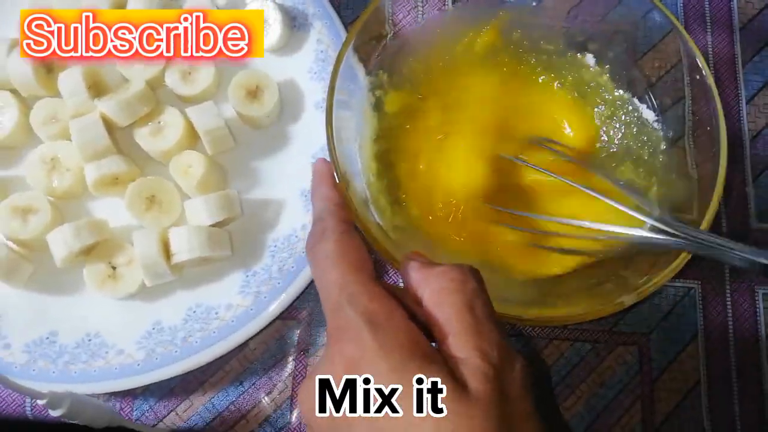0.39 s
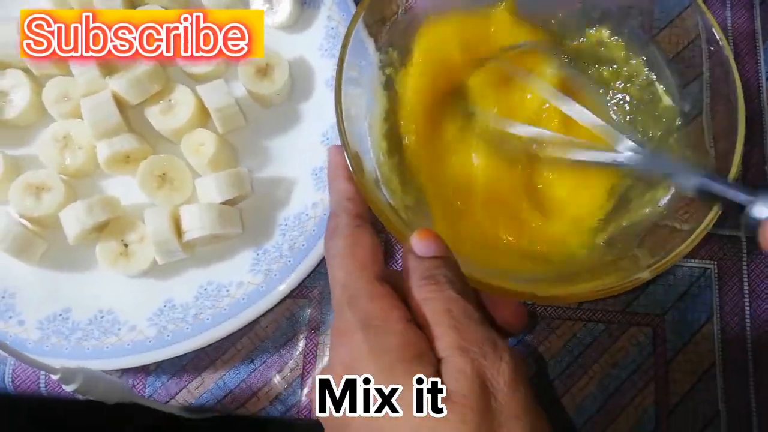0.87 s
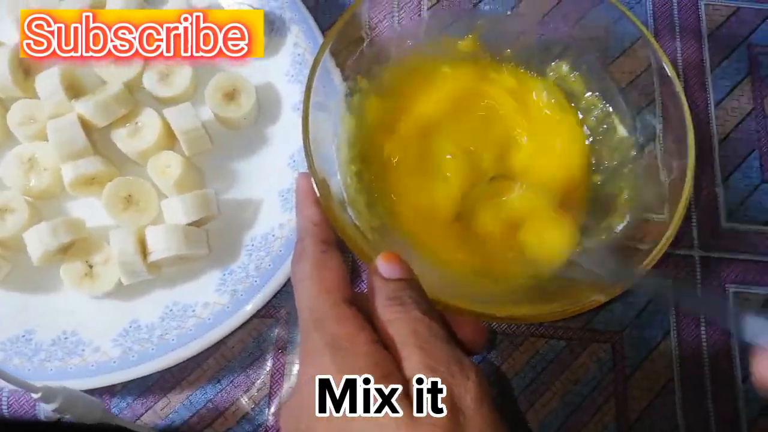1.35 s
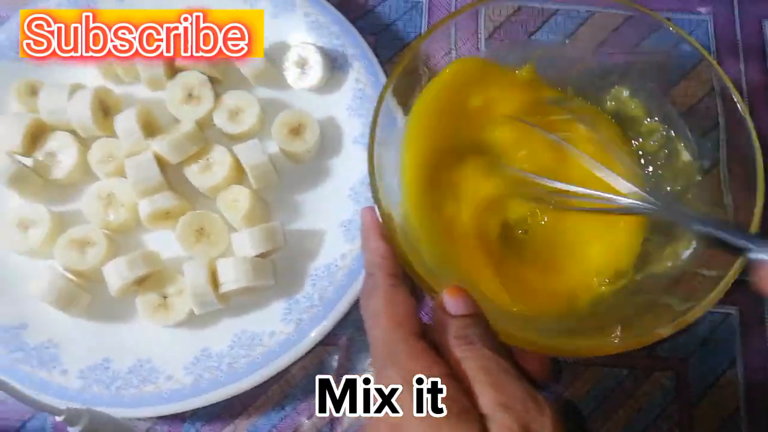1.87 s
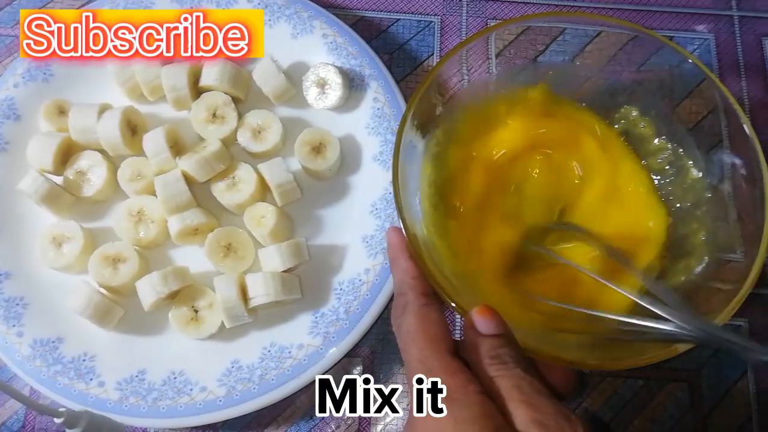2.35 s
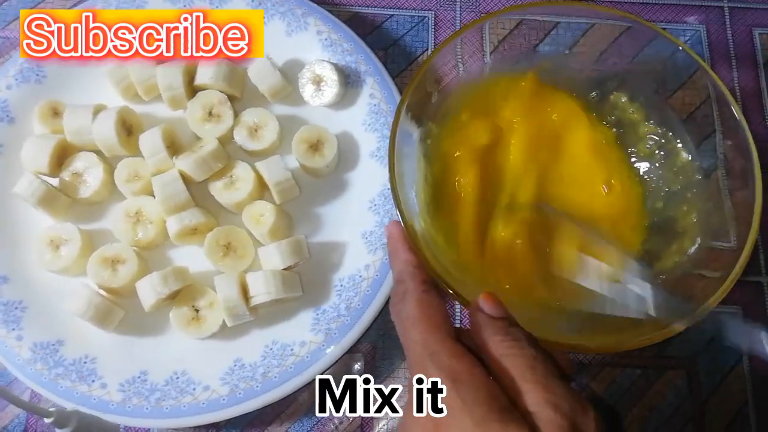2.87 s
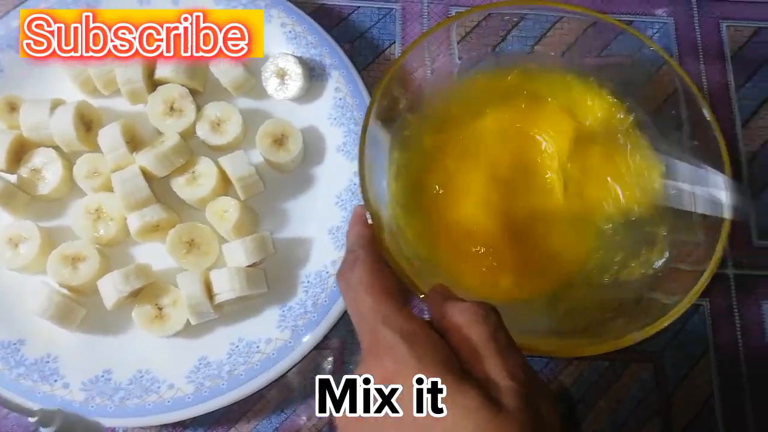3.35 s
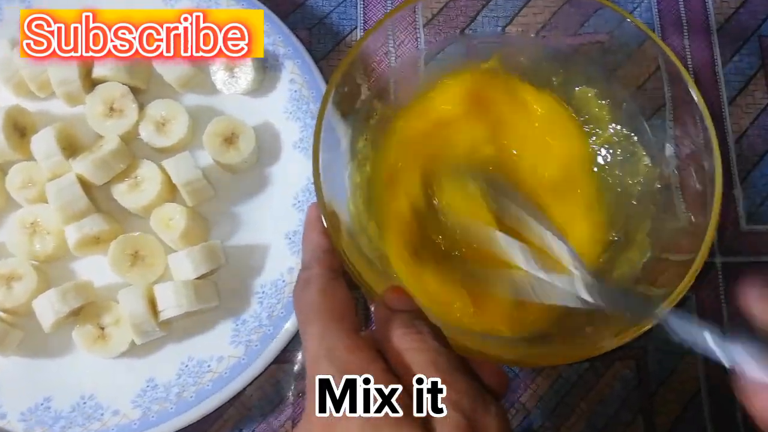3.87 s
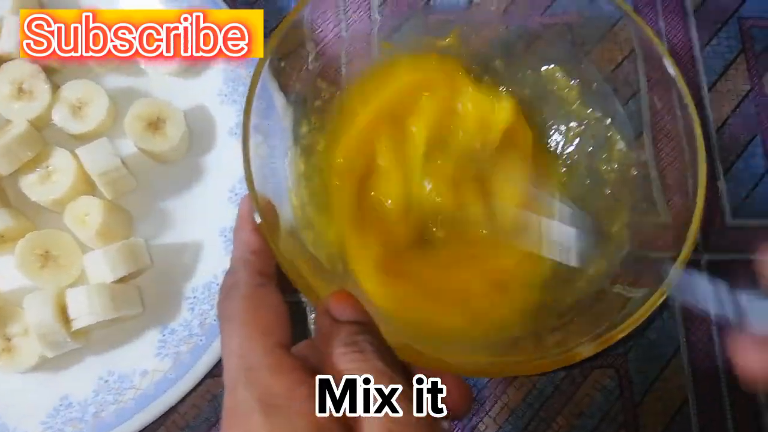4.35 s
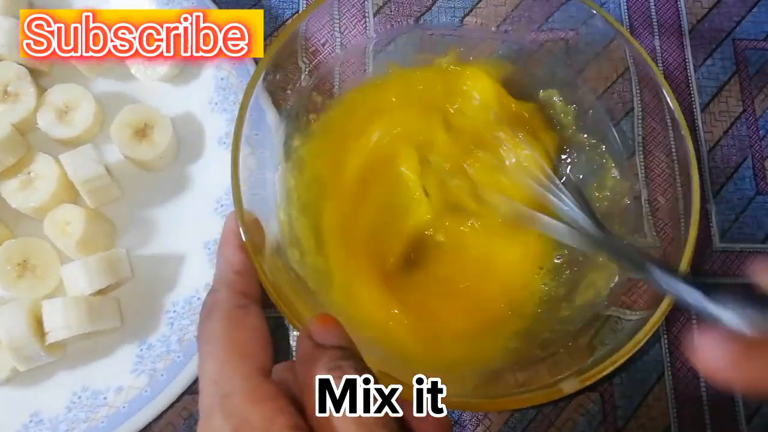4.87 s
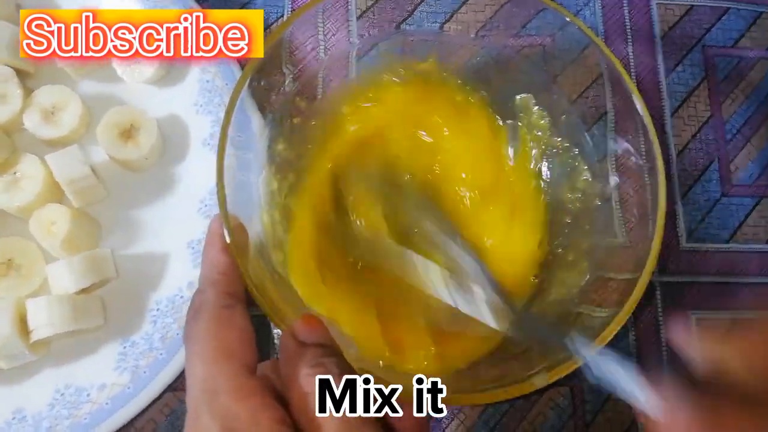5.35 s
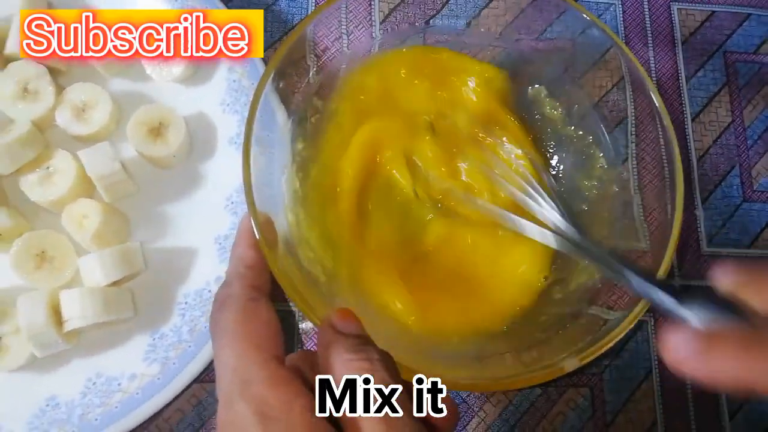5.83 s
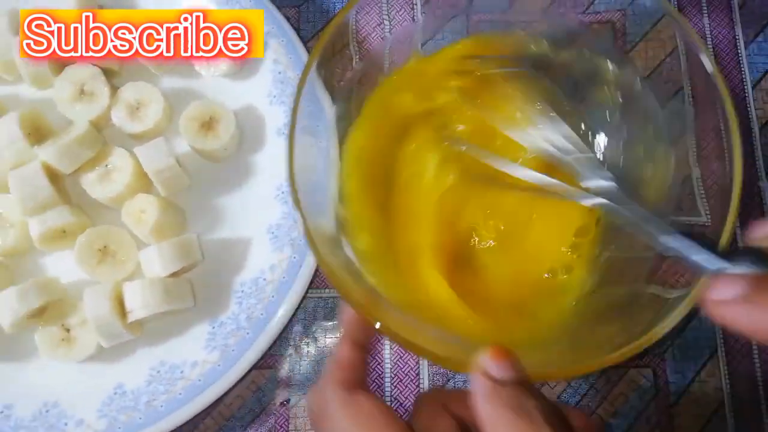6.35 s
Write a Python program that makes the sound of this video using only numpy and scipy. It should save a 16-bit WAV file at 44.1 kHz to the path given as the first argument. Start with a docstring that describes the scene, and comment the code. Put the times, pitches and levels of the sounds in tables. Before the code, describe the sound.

A metal whisk beats thick egg in a glass bowl at about five strokes a second. It starts softly, becomes vigorous within a second, eases briefly near three seconds, then goes on hard to the end. Bright wire clatter, scrapes, dull taps and wet slops, close to the microphone in a small hard kitchen.

```python
"""A wire whisk beats thick egg in a glass bowl on a kitchen table, about five strokes a second, heard close by.
It begins softly, is in full swing from 0.8 s, slows and slops less around 3 s, then beats on hard to the end.
In each stroke the wires brush the glass, clash on it in a bunch of noise pulses and drag along it as ticking
noise; the egg slops as a wet rush with bubbles, a low swing jolts the table, and the wires lift off.
Single taps, catches and gulps fall between; a small hard room answers; one microphone feeds both channels."""
import sys
import numpy as np
from scipy import signal
from scipy.fft import rfft, irfft, next_fast_len
from scipy.io import wavfile
from scipy.ndimage import uniform_filter1d, map_coordinates

SR = 44100
rng = np.random.default_rng(int(sys.argv[2]) if len(sys.argv) > 2 else 0)


def convert_level_to_amplitude(level_db):
    """Map a level in decibels to its linear amplitude factor."""
    exponent = np.asarray(level_db, float) / 20
    return 10 ** exponent


def master(y):
    """Save y as 16-bit WAV."""
    cut = np.clip(np.atleast_2d(y).T, -1, 1)
    pcm = np.round(cut * 32767)  # scale
    wavfile.write(sys.argv[1], SR, pcm.astype(np.int16))


N = 296198

# bunch of wires landing on the glass, one per stroke: t/s, peak level/dB, ring centre f/Hz
STROKES = [(0.231, -20.5, 4000), (0.41, -37.5, 3200), (0.614, -42, 2030), (0.8082, -12.5, 4050),
           (0.9931, -28, 4850), (1.2007, -25.5, 4550), (1.4075, -22, 4630), (1.5867, -19, 4170),
           (1.778, -17, 4700), (1.9829, -19.5, 4120), (2.166, -20, 3680), (2.3625, -16, 4400),
           (2.5392, -16, 4150), (2.7271, -12.5, 3820), (3.1021, -23.5, 4360), (3.3639, -13.5, 4840),
           (3.4744, -69, 4680), (3.6593, -19, 4230), (3.852, -15.5, 4000), (4.0404, -13.5, 5100),
           (4.2077, -10.5, 2840), (4.4011, -12.5, 4430), (4.597, -19, 4460), (4.778, -19, 3000),
           (4.9609, -14, 4930), (5.1532, -17.5, 4940), (5.341, -22, 4870), (5.5304, -13, 4570),
           (5.7288, -15, 3660), (5.8952, -15.5, 4510), (6.1017, -18.5, 5400), (6.32, -19, 4600),
           (6.5345, -20, 4360)]
# wires catching the glass again in mid stroke: t/s, peak level/dB, ring centre f/Hz
CATCHES = [(0.0525, -39.5, 4500), (0.1245, -30, 4700), (0.2096, -27, 4100), (0.2724, -35, 3140),
           (0.329, -29, 2320), (0.6594, -32.5, 3950), (0.7173, -31, 3890), (0.8452, -23.5, 3470),
           (0.858, -23.5, 3960), (0.907, -29.5, 3660), (1.04, -21.5, 2820), (1.2374, -25.5, 4340),
           (1.4522, -21, 4560), (1.4612, -24.5, 4700), (1.493, -23.5, 2870), (1.5226, -30, 1840),
           (1.6346, -18.5, 2920), (1.6498, -26.5, 3130), (1.6765, -24, 3180), (1.831, -24.5, 2150),
           (1.8444, -23, 2660), (1.869, -22, 4330), (2.0104, -28, 2770), (2.0492, -31, 4680),
           (2.1565, -23.5, 4130), (2.205, -20.5, 4850), (2.3999, -24, 4660), (2.4377, -18.5, 2230),
           (2.601, -23, 4140), (2.63, -14, 2650), (2.775, -27, 4400), (2.8645, -32.5, 4050),
           (2.8782, -28, 4050), (3.2033, -38, 3090), (3.251, -33, 3950), (3.2828, -26, 4010),
           (3.5405, -34, 3500), (3.6815, -22, 3640), (3.7375, -21, 1910), (3.9628, -24.5, 2200),
           (4.0654, -19.5, 3800), (4.0782, -24.5, 3710), (4.2473, -22, 3920), (4.8006, -23.5, 3990),
           (5.034, -25.5, 4300), (5.0549, -24.5, 3300), (5.2143, -26.5, 4100), (5.4129, -17.5, 4360),
           (5.5702, -20.5, 4520), (5.7968, -13.5, 3920), (5.9472, -31.5, 3800), (5.9777, -23, 2420),
           (6.1825, -19.5, 3100), (6.4279, -16.5, 3880), (6.5833, -23.5, 2780), (6.6243, -21.5, 2530)]
# one egg-coated wire alone, short and dull: t/s, peak level/dB, ring centre f/Hz
TAPS = [(0.307, -19.5, 2900), (0.329, -19.5, 2340), (0.5177, -28.5, 1870), (0.5585, -19.5, 2080),
        (0.6145, -31, 1870), (0.7585, -28, 1820), (1.0959, -32.5, 2720), (1.707, -23, 2740),
        (1.8964, -25.5, 2670), (2.2787, -27, 2560), (2.6613, -15.5, 2050), (3.1144, -26, 1790),
        (3.3829, -23, 1600), (3.5928, -19.5, 2160), (3.755, -15, 2160), (3.7778, -16, 2900),
        (3.9589, -21, 2160), (4.148, -13, 3600), (4.3287, -10.5, 2910), (4.5172, -16.5, 2130),
        (4.7045, -25, 1850), (4.882, -22, 2500), (5.6211, -15, 3220), (6.2833, -27.5, 2520)]
# air pockets closing in the egg: t/s, envelope peak level/dB, starting f/Hz
GULPS = [(0.027, -41.5, 868), (0.306, -37, 990), (0.706, -39, 690), (0.759, -34.5, 810), (0.982, -41, 690),
         (1.063, -41, 583), (2.638, -34.5, 830), (3.723, -42, 700), (4.273, -41.5, 590), (4.818, -43, 600),
         (5.013, -41, 595), (5.113, -38.5, 814), (5.295, -37.5, 950), (6.301, -42.5, 770),
         (6.385, -41.5, 148)]
# how hard the hand beats: t/s, slop level/dB, mean table jolt level/dB, scrape level/dB
EFFORT = [(0.2, -64, -46, -97), (0.8, -50.5, -38, -53), (1.4, -52.5, -32, -49), (2.0, -55, -45, -49),
          (2.55, -53.5, -32, -45.5), (2.72, -81, -63, -67), (3.36, -64.5, -58, -86),
          (3.5, -55.5, -33, -64.5), (4.4, -56, -56, -42), (5.2, -51.5, -40, -51.5), (5.9, -58, -38.5, -50),
          (6.55, -52, -32, -52)]
# lowest egg-damped bowl modes: f/Hz, relative level/dB, t60/s
BOWL_MODES = [(1023, 2.5, 0.036), (1915, -3.5, 0.015)]
# colour of bowl and microphone: f/Hz, relative level per Hz/dB
GLASS_COLOUR = [(600, -23), (1000, -20), (1450, -14), (1840, -4), (2720, 1.5), (3300, -1.5), (4500, 2),
                (5250, -4.5), (5800, -12.5), (7500, -1), (9300, -14.5), (14100, -21.5), (15800, -37)]
# dulling by egg on the wires: f/Hz, gain level/dB
WET_GAIN = [(600, 4.5), (5000, 0.5), (6500, -3), (15800, -6.5)]
# spectrum of the slopping egg: f/Hz, relative level per Hz/dB
SLOP_COLOUR = [(55, -3), (90, 2), (300, 0.5), (680, 4), (1300, -8.5)]
# spectrum of the steady background: f/Hz, relative level per Hz/dB
FLOOR_COLOUR = [(25, 8), (100, -11), (400, -17), (720, -9), (1300, -24)]

LANDING_S = 0.0031  # typical time scale of a bunch coming down
REACH_S = 0.0079  # rise time constant of the brush ahead of the landing
CONTACT_S, LIFT_S = 0.13, 0.0049  # landing to lift-off; lift-off time constant
SLOP_AFTER_S, JOLT_AFTER_S = 0.068, 0.1033  # landing to fullest slop; landing to jolt
SPLASH_DB, SPLASH_S = -3, 0.014  # wires entering the egg: level against the slop; rise time
TOP_HZ = 16100


def strikes(size=8192, spiky_db=3, lumpy_db=4, wires_db=5.5, ring_db=8, ring_q=5):
    """A bunch of wires chatters on the glass in uneven lumps, swelling and then thinning out."""
    s, peak_db, ring_hz = columns(STROKES + CATCHES)
    landing_s = LANDING_S * convert_level_to_amplitude(2 * rng.standard_normal(s.shape))
    u = np.arange(size) / SR / landing_s
    hz = np.fft.rfftfreq(size, 1 / SR) + 1
    force, spikes, lumps, wires = np.moveaxis(rng.standard_normal((len(s), 4, size)), 1, 0)
    lumps = unit(uniform_filter1d(lumps, size=60))
    swell = u ** 1.77 * np.exp(-1.4 * u)
    chatter = force * convert_level_to_amplitude(spiky_db * spikes + lumpy_db * lumps) * swell
    # other wires touch each time, so the narrow rings fall anew
    wire_rings = convert_level_to_amplitude(wires_db * unit(uniform_filter1d(wires[:, :len(hz)], size=60)))
    ring = convert_level_to_amplitude(ring_db) / np.hypot(1, ring_q * (hz / ring_hz - ring_hz / hz))
    gain = gain_at(GLASS_COLOUR, hz) * (1 + ring) * wire_rings
    return contacts(s - 0.003, peak_db, chatter, gain)


def taps(size=8192, tap_q=3):
    """A single cushioned blow: one broad ring of a few cycles."""
    s, peak_db, tap_hz = columns(TAPS)
    hz = np.fft.rfftfreq(size, 1 / SR) + 1
    blow = np.tile(np.arange(size) == 0, (len(s), 1)).astype(float)
    ring = 1 / (1 + (tap_q * (hz / tap_hz - tap_hz / hz)) ** 2) + convert_level_to_amplitude(-18.5)
    gain = gain_at(GLASS_COLOUR, hz) * gain_at(WET_GAIN, hz) * ring
    return contacts(s, peak_db, blow, gain + 1e-9, room_db=-7)


def contacts(s, peak_db, force, gain, room_db=-9, room_t60_s=0.17):
    """Forces on the glass, coloured by gain, ring the bowl's modes anew and are answered by the room."""
    t = np.arange(force.shape[1]) / SR
    mode_hz, mode_db, t60_s = columns(BOWL_MODES)
    # each contact excites each mode differently
    strength = convert_level_to_amplitude(5.6 * np.tanh(rng.standard_normal((len(s), len(BOWL_MODES)))) - 28.5)
    modes = strength @ (convert_level_to_amplitude(mode_db - 60 * t / t60_s) * np.sin(2 * np.pi * mode_hz * t))
    tail = rng.standard_normal(force.shape) * convert_level_to_amplitude(-60 * t / room_t60_s)
    room = 1 + convert_level_to_amplitude(room_db) * rfft(tail / np.linalg.norm(tail[0]))
    blows = irfft(rfft(force) * causal(gain) * (1 + rfft(modes)) * room)
    return placed(s, convert_level_to_amplitude(peak_db) * blows / np.abs(blows).max(axis=1, keepdims=True))


def drag(below_db=-23, linger_s=0.0083, light_db=-57, rest_db=-61, ticks_per_s=150):
    """Wires slide along the glass, slipping and ticking: noise scaled by their pressure on it."""
    s, peak_db, _ = columns(STROKES + CATCHES)
    start, _, _, scrape_db = effort()
    t = np.arange(SR // 2) / SR
    u = t / linger_s
    linger = placed(s, convert_level_to_amplitude(peak_db + below_db) * u * np.exp(1 - u))
    since = t - 6 * REACH_S  # 0 at the landing
    touching = np.exp(np.minimum(since, 0) / REACH_S) / (1 + np.exp((since - CONTACT_S) / LIFT_S))
    sweep = placed(start + since[0], convert_level_to_amplitude(scrape_db) * touching)
    pressure = linger + sweep + convert_level_to_amplitude(light_db) * stirring() + convert_level_to_amplitude(rest_db)

    grit = convert_level_to_amplitude(3 * wobble(500) + 3.5 * wobble(50))
    chance, size = rng.random(N), rng.standard_normal(N)
    tick_starts = (chance < ticks_per_s / SR) * convert_level_to_amplitude(7 * size)
    tick_decay = np.exp(-np.arange(SR // 50) / SR / 0.0029)
    ticking = signal.fftconvolve(tick_starts, tick_decay)[:N]
    hz = np.fft.rfftfreq(N, 1 / SR)
    rub = patchy(coloured_noise(GLASS_COLOUR), depth_db=3.5)
    rub = irfft(rfft(rub) * gain_at(WET_GAIN, hz), N)
    return pressure * unit((grit + 0.28 * ticking) * rub)


def egg(slop_s=0.029, count=6):
    """The egg splashes at the landing, slops ahead of the jolt as a rush and small bubbles, and gulps."""
    s, slop_db, _, _ = effort()
    t = np.arange(SR // 4) / SR
    u, v = t / slop_s, t / SPLASH_S
    slop = placed(s + SLOP_AFTER_S - slop_s, convert_level_to_amplitude(slop_db) * u * np.exp(1 - u))
    splash = placed(s - SPLASH_S, convert_level_to_amplitude(slop_db + SPLASH_DB) * v * np.exp(1 - v))
    swell = slop + splash + convert_level_to_amplitude(-68) * stirring()
    rush = unit(convert_level_to_amplitude(3.7 * wobble(70)) * patchy(coloured_noise(SLOP_COLOUR), depth_db=2))

    when, pitch, size = np.moveaxis(rng.standard_normal((len(s), count, 3)), -1, 0)
    small = (s + SLOP_AFTER_S + 0.05 * when, slop_db + 3 * size, 660 * convert_level_to_amplitude(2 * pitch))
    small_bubbles = bubbles(*(column.reshape(-1, 1) for column in small), cycles=1.46)
    gulps = bubbles(*columns(GULPS), cycles=1.84)
    return swell * rush + small_bubbles + gulps


def bubbles(s, level_db, hz, cycles):
    """Air pockets: a soft start, a rising pitch, gone in a few cycles."""
    turns = hz * np.arange(SR // 20) / SR
    u = turns / cycles
    return placed(s, convert_level_to_amplitude(level_db) * u * np.exp(1 - u) * np.sin(2 * np.pi * turns * (1 + 0.012 * u)))


def table(jolt_hz=30, jolt_s=0.016):
    """Each stroke swings the table up, down and back; it trembles as long as the whisk works."""
    s, _, jolt_db, _ = effort()
    jolt_db = jolt_db + 1.3 * rng.standard_normal(s.shape)
    t = np.arange(-SR // 10, SR // 10) / SR
    jolt = -convert_level_to_amplitude(jolt_db) * np.exp(-(t / jolt_s) ** 2 / 2) * np.cos(2 * np.pi * jolt_hz * t)
    tremble = convert_level_to_amplitude(-52) * stirring() * coloured_noise([(15, 11), (45, -4.5), (130, -16)])
    return placed(s + JOLT_AFTER_S + t[0], jolt) + tremble


def background():
    """Steady low-pitched noise under everything."""
    return convert_level_to_amplitude(-59.5) * coloured_noise(FLOOR_COLOUR)


def effort():
    """Start of each stroke, with its slop, jolt and scrape levels."""
    s = np.array(STROKES)[:, :1]
    when, *levels = np.transpose(EFFORT)
    return s, *(np.interp(s, when, level_db) for level_db in levels)


def stirring():
    """How hard the egg is moving: a hump per stroke, rms 1 overall."""
    s, slop_db, _, _ = effort()
    return unit(placed(s - 0.05, convert_level_to_amplitude(slop_db) * np.hanning(SR // 4)))


def unit(x):
    """x at rms 1."""
    return x / np.sqrt(np.mean(x ** 2))


def gain_at(points, hz):
    """Gain through f/Hz, level/dB points on a log axis; -120 dB outside them."""
    f, db = np.transpose(points)
    return convert_level_to_amplitude(np.interp(np.log(hz + 1), np.log(f + 1), db, left=-120, right=-120))


def causal(gain):
    """Minimum-phase response of this gain: it starts at the blow."""
    cepstrum = irfft(np.log(gain))
    half = cepstrum.shape[-1] // 2
    fold = np.r_[1, np.full(half - 1, 2), 1, np.zeros(half - 1)]
    return np.exp(rfft(cepstrum * fold))


def coloured_noise(points):
    """Noise of rms 1 with the spectrum of the points."""
    size = next_fast_len(N)
    spectrum = rfft(rng.standard_normal(size)) * gain_at(points, np.fft.rfftfreq(size, 1 / SR))
    return unit(irfft(spectrum, size)[:N])


def wobble(knots_per_s):
    """A smooth random curve."""
    knots = rng.standard_normal(int(N * knots_per_s / SR) + 2)
    return map_coordinates(knots, [np.arange(N) * knots_per_s / SR])


def patchy(x, depth_db):
    """x with random patches of gain over time and frequency."""
    z = signal.stft(x, nperseg=256)[2]
    field = uniform_filter1d(rng.standard_normal(z.shape), size=5, axis=0)
    field = uniform_filter1d(field, size=5, axis=1)
    return signal.istft(z * convert_level_to_amplitude(depth_db * unit(field)), nperseg=256)[1][:N]


def placed(times_s, rows):
    """Each row added at its time."""
    at = np.round(np.ravel(times_s) * SR).astype(int)[:, None] + np.arange(rows.shape[1])
    return np.bincount(np.clip(at, 0, N).ravel(), rows.ravel(), N + 1)[:N]


def columns(events):
    """The columns of a table, one event a row."""
    return (c[:, None] for c in np.transpose(events))


def scene():
    """Everything reaches one microphone, which feeds both channels."""
    mono = strikes() + taps() + drag() + egg() + table() + background()
    return np.array([mono, mono])


def roll_off(x):
    """The treble ends steeply here."""
    return signal.sosfilt(signal.butter(12, 16450, fs=SR, output="sos"), x)


def record(dry):
    """A trace of hiss, opposite in the two channels, then a steep band limit."""
    hz = np.fft.rfftfreq(N, 1 / SR)
    hiss = convert_level_to_amplitude(-79.5) * coloured_noise([(60, -12), (500, -9), (3000, -20.5), (15000, -15)])
    band_limit = 1 / (1 + (hz / TOP_HZ) ** 40)
    mix = irfft(rfft(dry + np.array([hiss, -hiss])) * band_limit, N)
    return roll_off(mix)


dry = scene()
out = record(dry)
master(out)
```